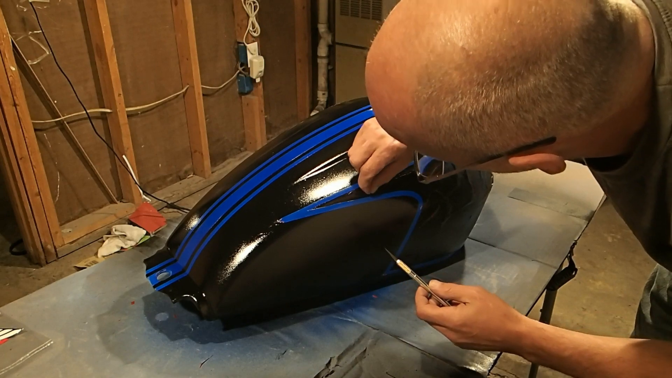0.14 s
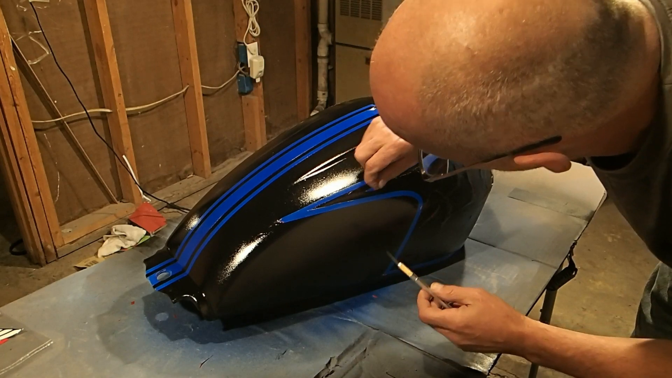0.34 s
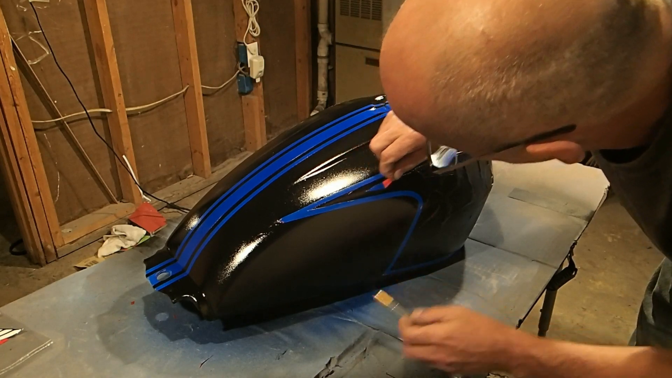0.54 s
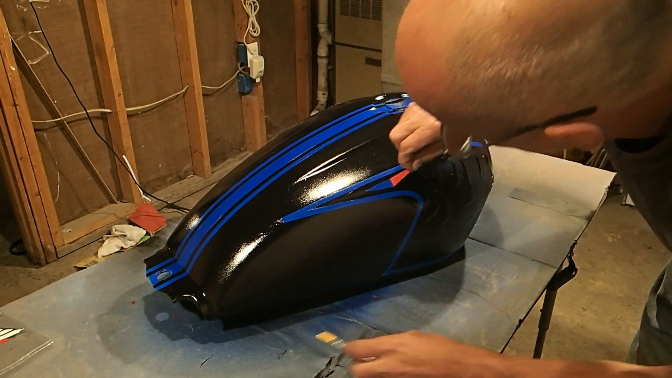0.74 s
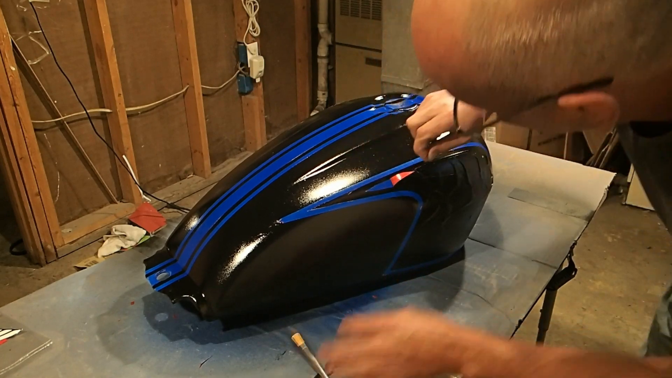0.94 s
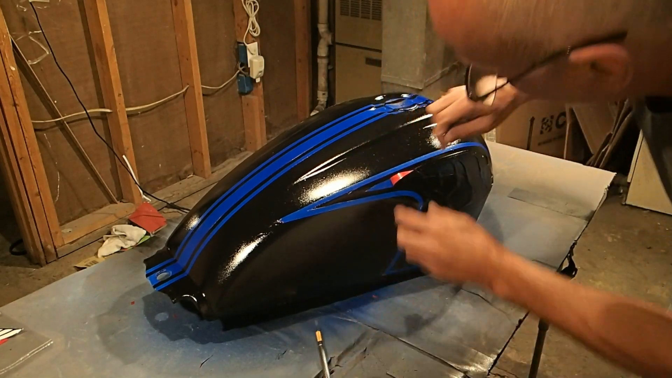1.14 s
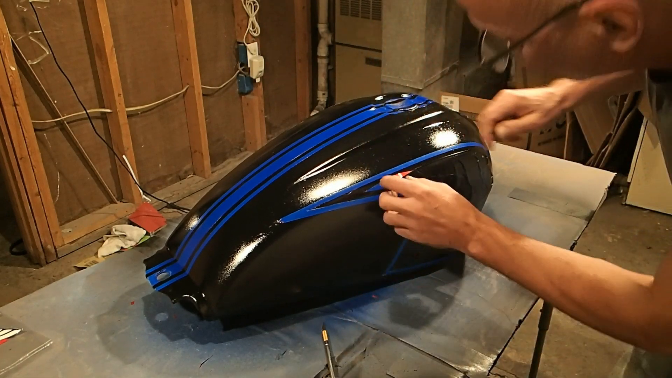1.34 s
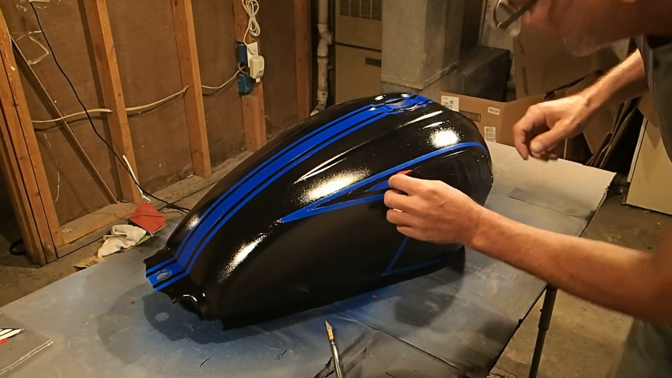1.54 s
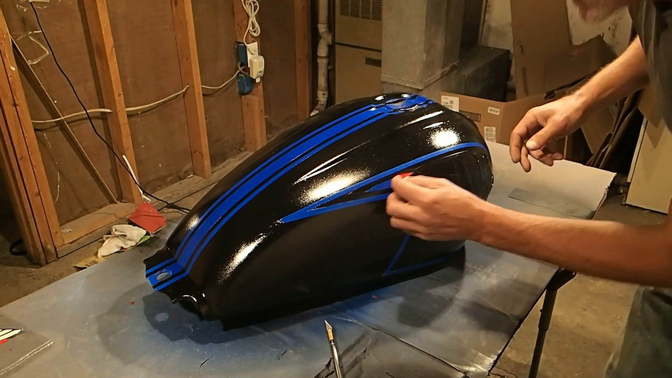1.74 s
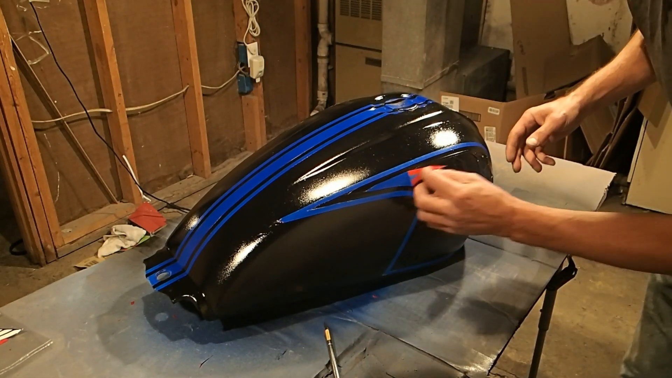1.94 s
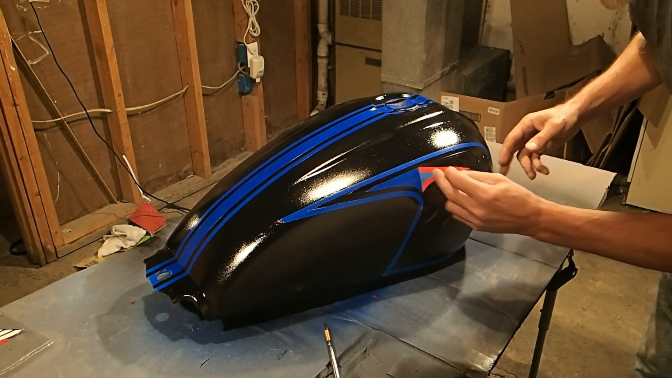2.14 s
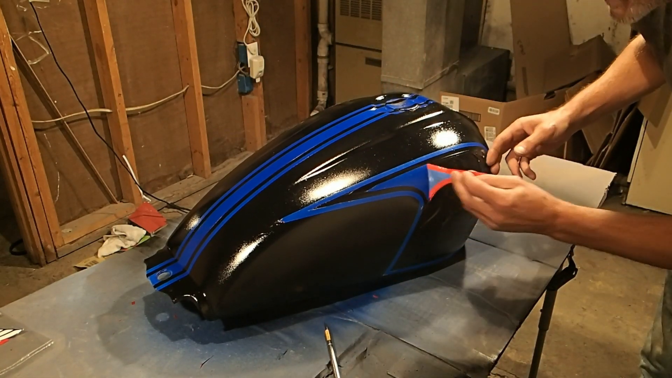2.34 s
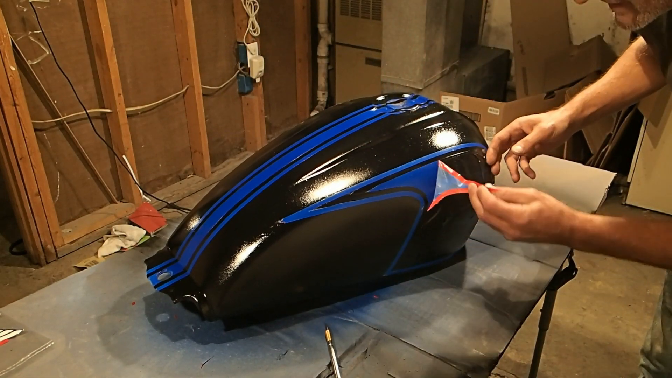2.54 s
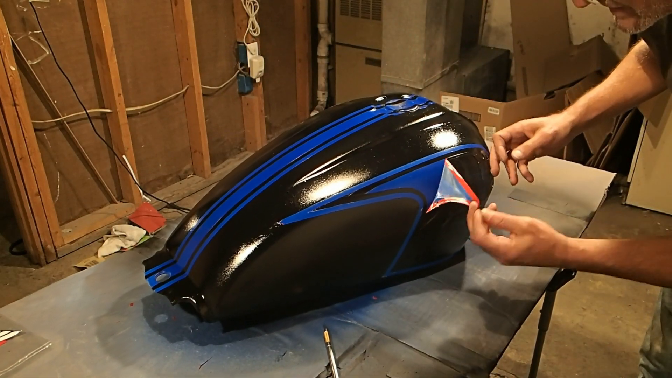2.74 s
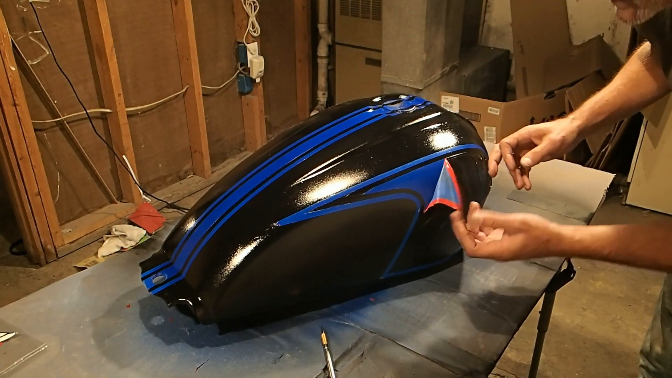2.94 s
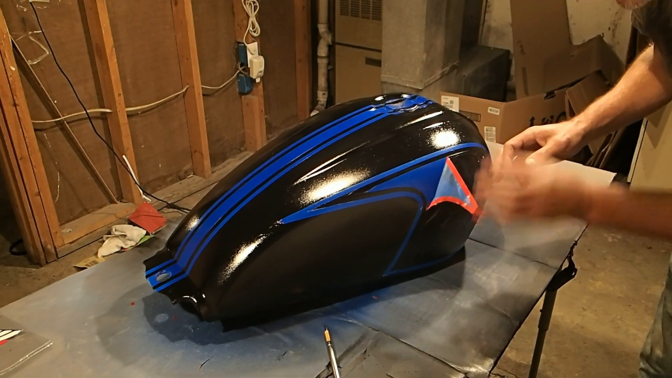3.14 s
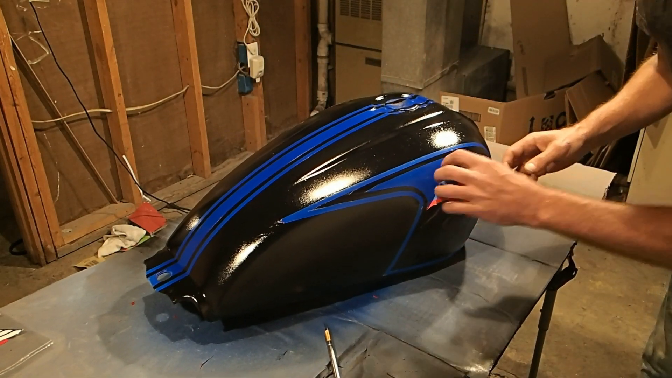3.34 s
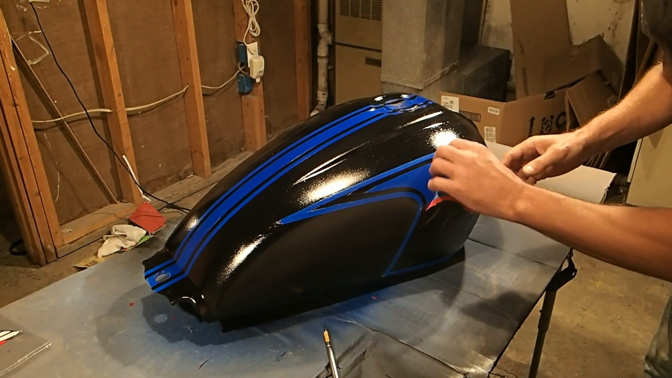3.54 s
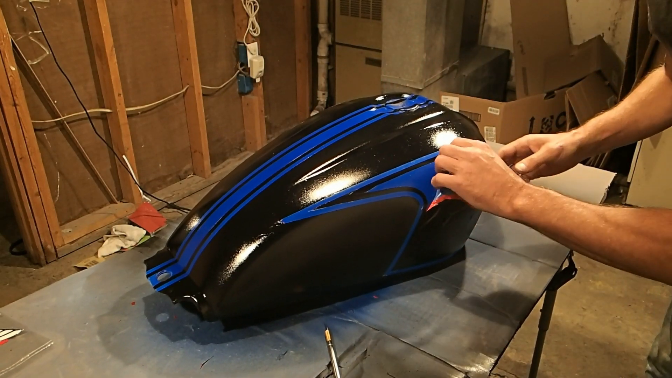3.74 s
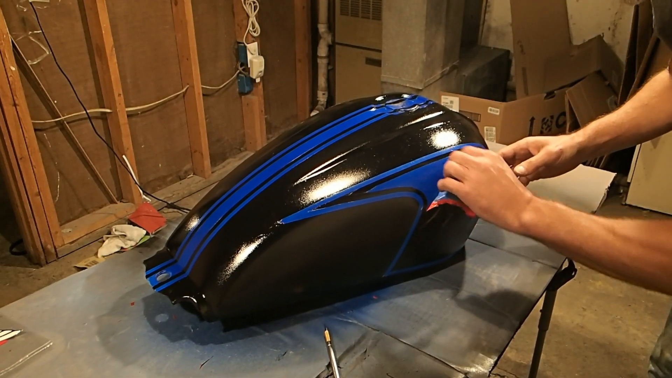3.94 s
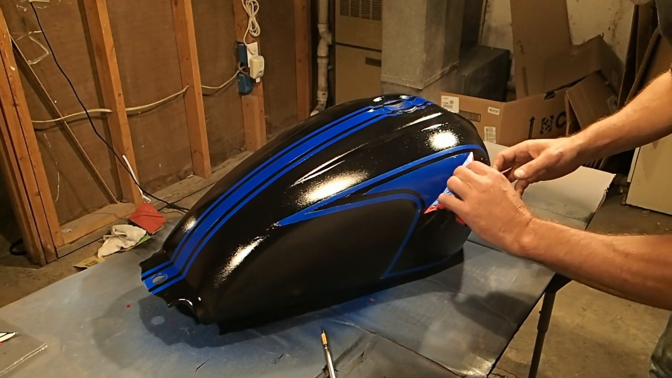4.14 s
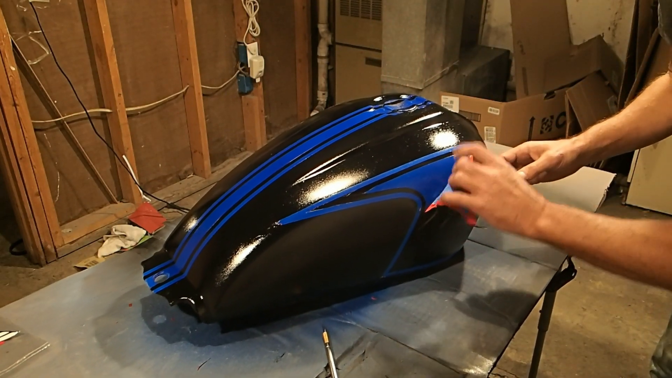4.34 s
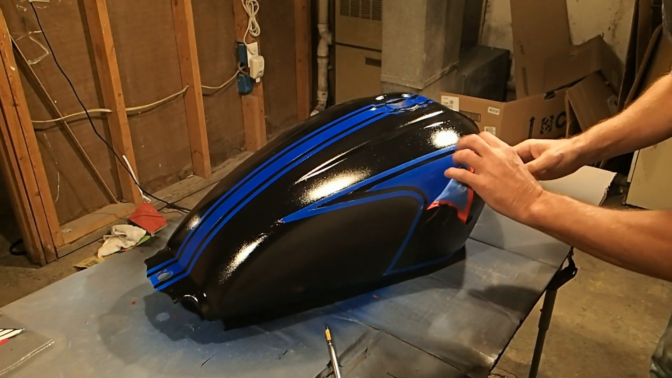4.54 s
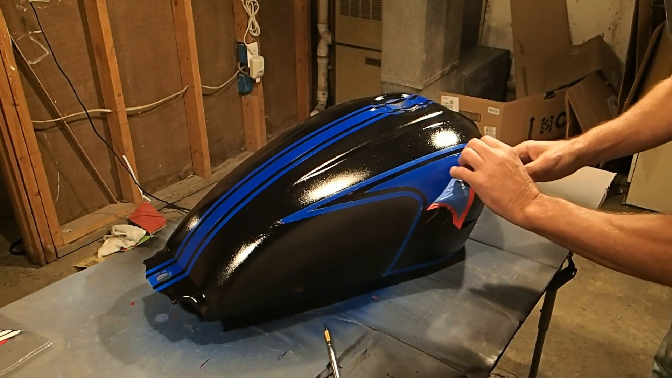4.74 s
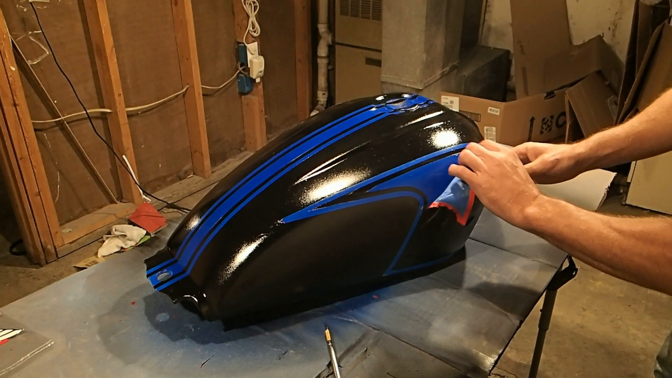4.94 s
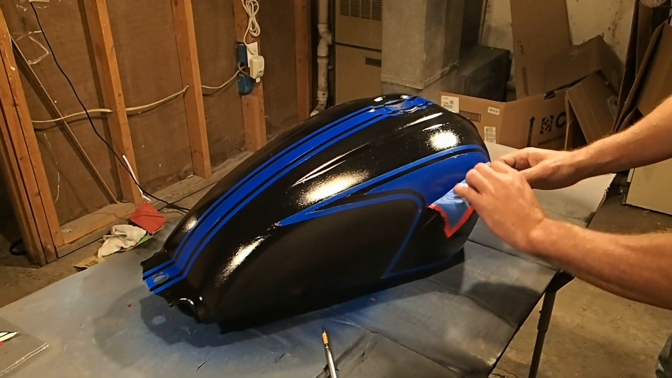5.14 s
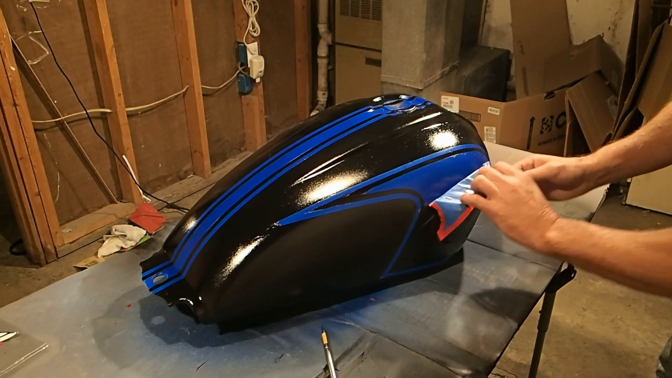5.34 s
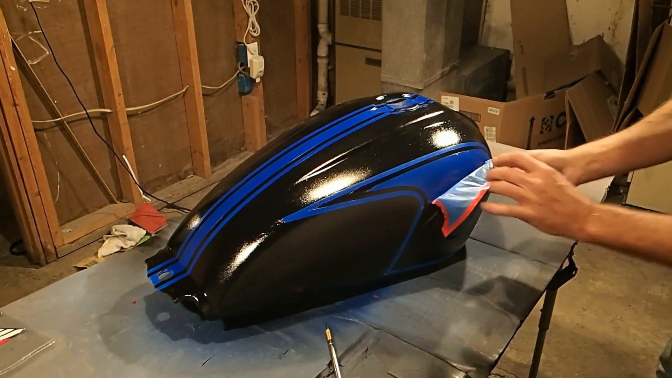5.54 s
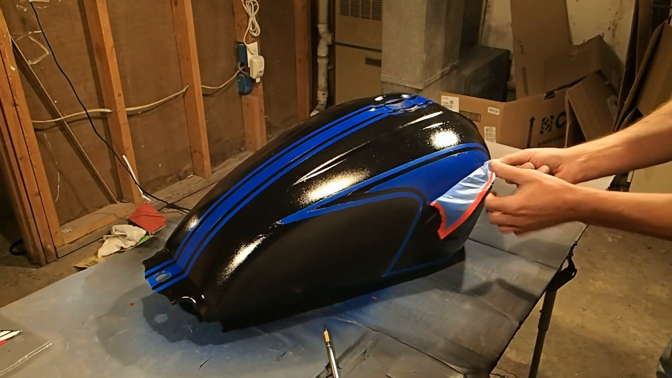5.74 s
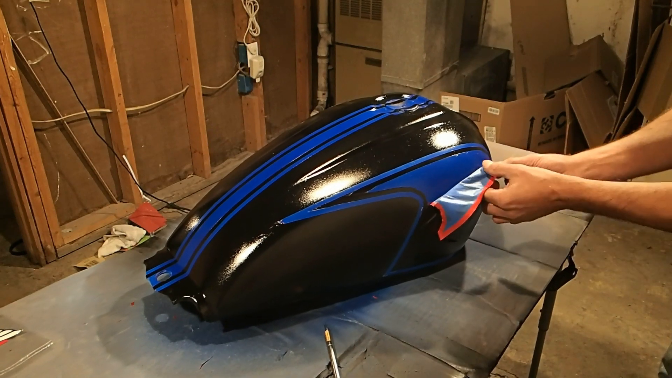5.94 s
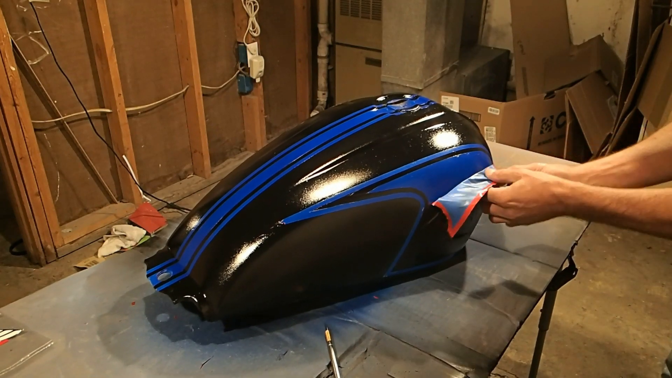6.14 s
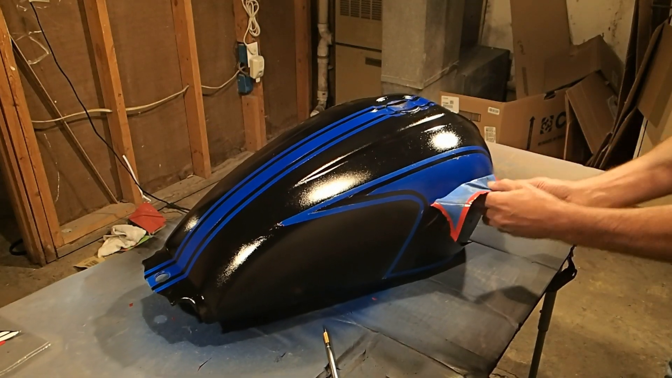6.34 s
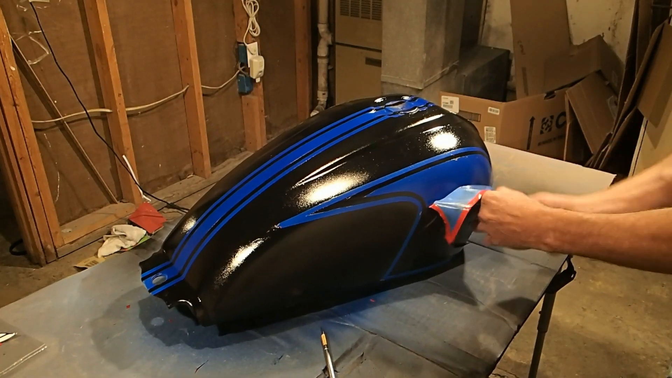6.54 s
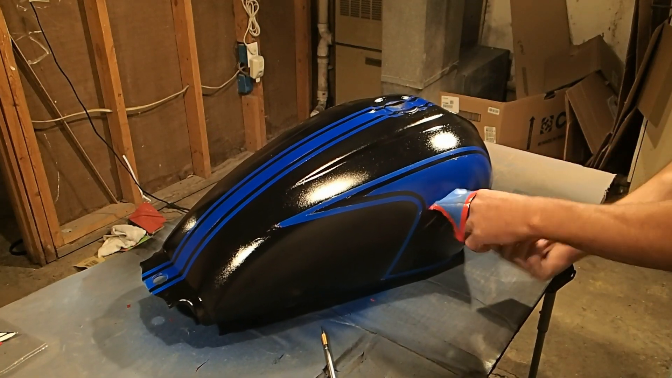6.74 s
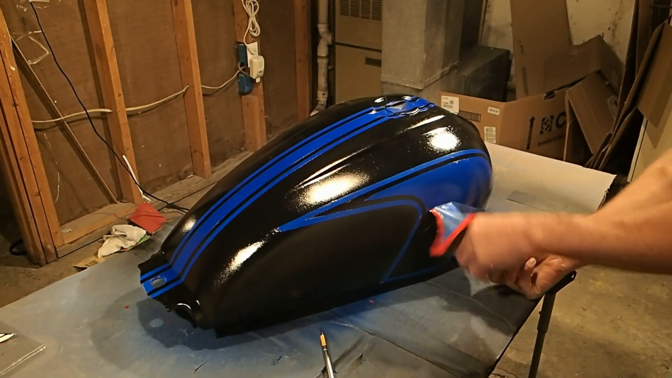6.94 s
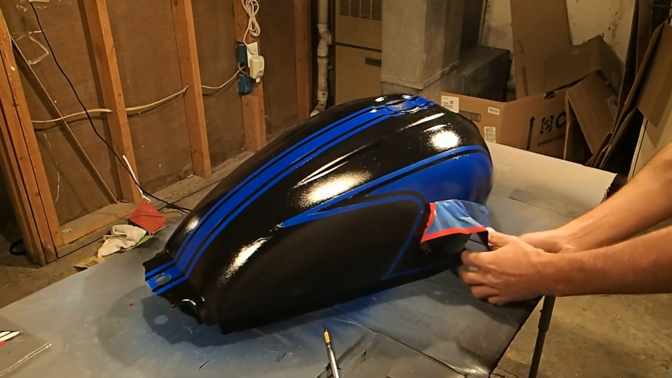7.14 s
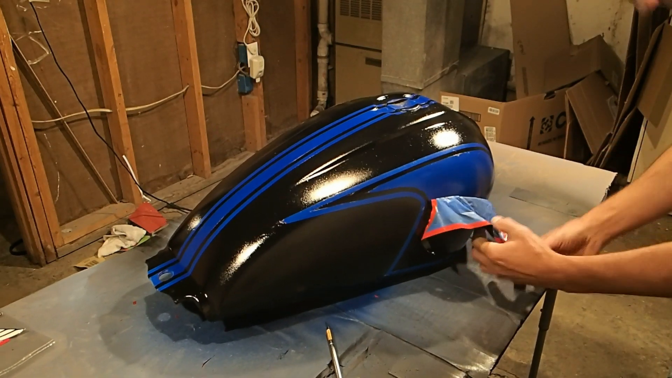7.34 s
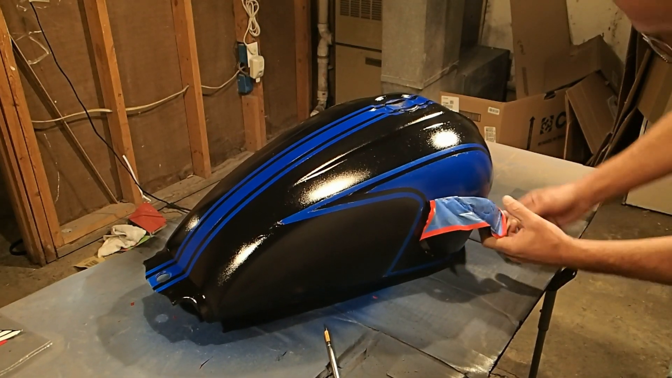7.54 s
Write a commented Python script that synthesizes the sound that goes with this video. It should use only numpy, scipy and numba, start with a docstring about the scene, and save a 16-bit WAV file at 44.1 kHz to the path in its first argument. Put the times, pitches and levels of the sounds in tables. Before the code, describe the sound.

Masking tape is peeled by hand off a hollow steel tank in short crackling rips, with sharp snaps and papery crumples.

```python
"""Masking tape and its masking sheet are peeled by hand off a freshly painted steel fuel tank.
The glue lets go in dense tiny cracks and single snaps that ring the hollow tank; the taut strip sings.
The loose sheet buckles, fingers rub and tick, a brush and hands knock softly.
Two close microphone ports hear it in a small workshop, over quiet room noise."""
import sys
import numpy as np
from scipy import signal
from scipy.fft import rfft, irfft
from scipy.io import wavfile
from numba import njit

SR = 44100
rng = np.random.default_rng(int(sys.argv[2]) if len(sys.argv) > 2 else 0)


def to_wav(sig):
    """Store sig (one row per channel, or 1-D mono) as 16-bit WAV at the path in sys.argv[1].

    Samples outside -1..1 are clipped; the rate is SR.
    """
    pcm = np.clip(np.atleast_2d(sig), -1, 1) * 32767
    pcm = np.round(pcm).astype(np.int16)
    wavfile.write(sys.argv[1], SR, pcm.T)  # frames by channels


N = 335477
TIME = np.arange(N) / SR


def undb(db):
    """Decibels to gain."""
    return 10 ** (np.asarray(db) / 20)


def unit(h):
    """Scale to energy 1."""
    return h / np.sqrt(np.sum(h ** 2, axis=-1, keepdims=True))


def convolve(x, h):
    """Pass a sound through a response."""
    return signal.oaconvolve(x, h, axes=-1)[..., :N]


def response(points, size=4096):
    """Minimum-phase impulse response of a (f/Hz, level/dB) spectrum."""
    hz, db = np.transpose(points)
    grid_hz = np.maximum(np.arange(size // 2 + 1) * SR / size, 1)
    gain = undb(np.interp(np.log(grid_hz), np.log(hz), db))
    cepstrum = irfft(np.log(gain))
    cepstrum[1:size // 2] *= 2
    cepstrum[size // 2 + 1:] = 0
    return irfft(np.exp(rfft(cepstrum)))[:size // 2]


def colour(x, points):
    """Give a white sound a spectrum at equal power."""
    return convolve(x, unit(response(points)))


def add(track, start_s, sound):
    """Mix a sound into a track."""
    i = int(np.clip(start_s * SR, 0, N - 1))
    track[i:i + len(sound)] += sound[:N - i]


def walk(per_s):
    """Random value wandering at the given rate."""
    knots = TIME[::int(SR / per_s)]
    return np.interp(TIME, knots, rng.standard_normal(len(knots)))


@njit
def resonate(x, hz, width_hz):
    """State-variable band-pass, centre set per sample; white sound keeps its power."""
    y, band, low = np.empty(len(x)), 0., 0.
    for i in range(len(x)):
        g, damping = np.tan(np.pi * hz[i] / SR), width_hz / hz[i]
        v = (band + g * (x[i] - low) + 1e-18) / (1 + g * (g + damping))
        band, low = 2 * v - band, low + 2 * g * v
        y[i] = damping * v
    return y * np.sqrt(SR / (np.pi * width_hz))


def cracks(per_s, scatter_db, size=N):
    """Randomly timed clicks of scattered strength, rms 1."""
    fired = rng.random(size) < per_s / SR
    strength = undb(scatter_db * np.clip(rng.standard_normal(size), -2, 2))
    return unit(fired * strength * rng.choice([-1, 1], size) + 1e-12) * np.sqrt(size)


def burst(fade_s, per_s, size=8192):
    """Flurry of clicks decaying from about rms 1."""
    fade = np.exp(-np.arange(size) / SR / fade_s)
    return unit(cracks(per_s, 5.6, size) * fade) * np.sqrt(np.sum(fade ** 2))


def diffuse(apart_hz, bass_side, size=N):
    """Diffuse noise at two close ports: alike in the bass, unrelated in the treble."""
    mid, side = rfft(rng.standard_normal((2, size)))
    hz = np.arange(len(mid)) * SR / size
    angle = np.pi / 4 * np.clip(bass_side + hz / apart_hz, 0, 1)
    return irfft(mid * np.cos(angle) + np.outer([1, -1], side * np.sin(angle)), size)


# Room noise spectrum: f/Hz, level/dB
ROOM_SPECTRUM = [(20, -34), (60, -11), (130, 0), (300, 0), (600, -1), (1200, -8.5), (2500, -15.5),
                 (4500, -22), (8000, -22.5), (15000, -24.5)]
def room_noise(rush_db=-45.0, rumble_db=-66):
    """Steady low rush of the building with faint hiss; the rumble differs between ports."""
    rush = convolve(diffuse(15000, 0.38), unit(response(ROOM_SPECTRUM))[None])
    low_band = signal.butter(2, [25, 90], "band", fs=SR, output="sos")
    rumble = signal.sosfilt(low_band, rng.standard_normal((2, N)))
    return undb(rush_db) * rush + undb(rumble_db) * rumble / rumble.std()


def workshop(x, early_db=-5, early_s=0.0055, tail_db=-3, t60_s=0.47, half_t60_hz=17000, size=32768):
    """Direct sound, quick bench reflections, then a short tail whose treble dies first."""
    t = TIME[:size]
    arrived = t > .0008
    build_up = 1 - np.exp(-t / 0.0064)
    blend = 0.73 * walk(8)  # moving hands and tape shift the reflections
    out = x
    for weight in (np.cos(blend), np.sin(blend)):
        early = unit(diffuse(10500, 0.099, size) * arrived * np.exp(-t / early_s))
        hz, age_s, cells = signal.stft(diffuse(14000, 0.016, size), SR)
        decay = np.exp(-np.log(1000) * np.outer(1 + (hz / half_t60_hz) ** 2, age_s) / t60_s)
        tail = unit(signal.istft(cells * decay, SR)[1][:, :size] * build_up)
        out = out + convolve((x * weight)[None], undb(early_db) * early + undb(tail_db) * tail)
    return out / np.sqrt(1 + undb(early_db) ** 2 + undb(tail_db) ** 2)


# Knock, thud and hiss (scuffs, peel line) spectra: f/Hz, level/dB
KNOCK_SPECTRUM = [(60, -11), (200, -6), (380, 4.5), (520, -1), (720, 2), (1250, -0.5), (1800, -9.5),
                  (4000, -29), (9000, -61)]
THUD_SPECTRUM = [(25, -46), (70, -15), (150, -17), (230, 2), (400, -17.5), (1500, -40)]
HISS_SPECTRUM = [(40, -59), (300, -33.5), (1500, -32.5), (3300, -3.5), (4500, -0.5), (6500, 2.5),
                 (8500, -2), (11000, -5), (13000, -14), (16000, -29)]
# Brush laid down, later hands on the tank: t/s, level/dB, thud trim/dB, contact rise/s
BUMPS = [(0.831, -13.5, -9, 0.0016), (0.88, -17, -19, 0.001), (1.005, -27.5, -7, 0.0018),
         (6.881, -32, 2, 0.0012), (6.931, -22, -4, 0.0014), (7.062, -21, -1, 0.0021),
         (7.076, -22, -3, 0.0025), (7.132, -18, -13, 0.0025), (7.152, -29, -17, 0.003)]
def bumps(knock_db=-2, thud_db=-1, boom_db=-2, boom_hz=152.0, scuff_db=-11, fade_s=0.012):
    """Soft contacts: dull knock, scuff, low thud and the boom of the hollow tank."""
    knock, thud = np.zeros((2, N))
    for start_s, db, thud_trim_db, rise_s in BUMPS:
        push = burst(fade_s, per_s=2600) * undb(db)
        push *= 1 - np.exp(-TIME[:len(push)] / rise_s)
        add(knock, start_s, push * undb(knock_db))
        add(thud, start_s, push * undb(thud_trim_db + thud_db))
    scuff = undb(scuff_db) * colour(knock, HISS_SPECTRUM)
    boom = undb(boom_db) * resonate(thud, np.full(N, boom_hz), width_hz=16.0)
    return colour(knock, KNOCK_SPECTRUM) + scuff + colour(thud, THUD_SPECTRUM) + boom


# Folds of the loose sheet: t/s, level/dB, f/Hz
BUCKLES = [(1.126, -30, 606), (4.506, -21, 567), (5.201, -27.5, 656), (5.388, -29.5, 494),
           (5.499, -19.5, 530), (5.534, -28, 700), (6.835, -27, 670), (7.281, -29, 495), (7.318, -29, 1030),
           (7.348, -28.5, 800)]
def buckles(width_hz=620.0, fade_s=0.014, puff_db=-15):
    """The freed sheet folds over with a hollow, papery crumple and a puff of air."""
    crumple, puff = np.zeros((2, N))
    for start_s, db, hz in BUCKLES:
        push = burst(fade_s, per_s=1200) * undb(db)
        centre_hz = np.full(len(push), float(hz))
        fold = resonate(resonate(push, centre_hz, width_hz), centre_hz, width_hz)
        add(crumple, start_s, unit(fold) * np.linalg.norm(push))
        add(puff, start_s, push)
    return crumple + undb(puff_db) * colour(puff, THUD_SPECTRUM)


# Notes of the taut strip: start t/s, end t/s, first f/Hz, last f/Hz, level/dB
ZIPS = [(.36, 0.825, 1380, 1480, -32.5), (1.74, 1.883, 1900, 1090, -30), (3.906, 4.02, 2330, 1110, -28),
        (4.9, 5, 3250, 1800, -34), (5.026, 5.063, 3650, 3430, -30), (6.226, 6.317, 2330, 1570, -37),
        (6.422, 6.552, 860, 885, -31.5)]
def zips(width_hz=520.0, slips_per_s=2400):
    """Quick slips pluck the taut strip; its note mostly falls as more comes free."""
    out, slips = np.zeros(N), cracks(slips_per_s, scatter_db=3.0)
    for start_s, end_s, first_hz, last_hz, db in ZIPS:
        span = (TIME >= start_s) & (TIME < end_s)
        hz = np.geomspace(first_hz, last_hz, span.sum())
        note = resonate(resonate(slips[span], hz, width_hz), hz, width_hz)
        envelope = signal.windows.tukey(len(note), .2) * undb(db)
        add(out, start_s, unit(note) * np.sqrt(len(note)) * envelope)
    return out


# Steel tank modes: f/Hz, level/dB
TANK_MODES = [(296, 4), (385, -2), (501, 3), (588, -0.5), (646, -4), (830, 4.5), (1020, -0.5), (1180, 3.5),
              (1385, -7.5), (1440, 7.5), (1615, 0.5), (1750, 6), (1998, -46), (2210, 4.5), (2542, -35),
              (2840, -4)]
def tank(push, base_width_hz=7, loss=0.0097, shift_db=2.5):
    """The shell rings; each mode swells and fades as the peel line moves over it."""
    low_cut = signal.butter(2, 220, "high", fs=SR, output="sos")  # tape is too light to drive the bass
    push = signal.sosfilt(low_cut, push)
    hz, db = np.transpose(TANK_MODES)
    widths_hz = base_width_hz + loss * hz
    weights = unit(undb(db) * np.sqrt(widths_hz))
    ring = np.zeros(N)
    for k in range(len(hz)):
        coupling = undb(shift_db * walk(4.6))
        ring += (-1) ** k * weights[k] * resonate(push * coupling, np.full(N, hz[k]), widths_hz[k])
    return ring


def spread(hiss, rasp, sizzle_db, body_db, ring_db):
    """Split cracks into five drives: sizzle, hiss, rasp, body, tank ring."""
    return np.array([hiss * undb(sizzle_db), hiss, rasp, rasp * undb(body_db), rasp * undb(ring_db)])


def fingers(hiss_db=-64, rasp_db=-60, shifts_per_s=14):
    """Fingertips rub the tape and shift grip: a faint, dry rustle that comes and goes."""
    rub = cracks(per_s=500, scatter_db=4) * undb(4 * walk(shifts_per_s))
    return spread(rub * undb(hiss_db), rub * undb(rasp_db), sizzle_db=4, body_db=-9, ring_db=-18)


# Short tugs and faint finger ticks: t/s, level/dB, rasp trim/dB
TUGS_AND_TICKS = [(1.0067, -23.5, -3.5), (1.73, -10, -4.5), (2.7639, -6.5, -8), (2.9478, -19, -9),
                  (4.3643, -20.5, 1), (4.444, -8.5, -15), (5.2717, -27, 0.5), (5.3708, -13, -8.5),
                  (5.389, -10, -10.5), (5.5, -12.5, -5), (5.734, -18.5, 3.5), (5.7794, -22.5, -1),
                  (5.8311, -33.5, 6.5), (5.895, -33, 4.5), (5.9795, -19.5, -17), (6.0223, -8, -8),
                  (6.0502, -13, -7), (6.088, -10, -12), (6.1111, -13, -7.5), (6.9656, -14.5, -13),
                  (7.0733, -17, -27), (7.2152, -13, -7), (7.3475, -19, -1.5), (7.461, -24, -8),
                  (7.5764, -31.5, -8)]
def tugs_and_ticks(hiss_db=-7, rasp_db=-4, fade_s=0.0091):
    """Short tugs and faint finger ticks: brief flurries of tiny cracks."""
    hiss, rasp = np.zeros((2, N))
    for start_s, db, rasp_trim_db in TUGS_AND_TICKS:
        flurry = burst(fade_s, per_s=3500) * undb(db)
        add(hiss, start_s, flurry * undb(hiss_db))
        add(rasp, start_s, flurry * undb(rasp_trim_db + rasp_db))
    return spread(hiss, rasp, sizzle_db=-5.5, body_db=-5.5, ring_db=-9)


# Loudest glue snaps: t/s, level/dB, rasp trim/dB
SNAPS = [(2.3104, -13, -32), (2.5892, -12, -1.5), (2.6161, -8.5, -8), (2.6755, -13.5, -2),
         (3.8205, -7, -17), (4.0171, -11, 1), (4.8582, -2.5, -10.5), (4.905, -13, 0), (4.9431, -15, 3),
         (4.9664, -10, -0.5), (6.481, -4.5, -31), (7.1633, -8.5, -2.5)]
def snaps(hiss_db=11.0, rasp_db=14, threads_db=-3, threads_s=0.001):
    """A stuck spot lets go in one sharp click; its last threads break right behind."""
    hiss, rasp = np.zeros((2, N))
    for start_s, db, rasp_trim_db in SNAPS:
        click = undb(threads_db) * unit(burst(threads_s, per_s=6800))
        click[0] = 1
        add(hiss, start_s, unit(click) * undb(db + hiss_db))
        add(rasp, start_s, unit(click) * undb(db + rasp_trim_db + rasp_db))
    return spread(hiss, rasp, sizzle_db=-29.0, body_db=-16.0, ring_db=-16.5)


def stick_slip(gap_s=0.02, jitter=0.3, scatter_db=3, count=600):
    """Glue sticks and snaps at a loosely regular pace, rms 1."""
    timing, strength = rng.standard_normal((count, 2)).T
    at = (np.cumsum(gap_s * np.exp(jitter * timing)) * SR).astype(int)
    train = np.zeros(N)
    train[at[at < N]] = undb(scatter_db * np.clip(strength[at < N], -2, 2))
    return unit(train) * np.sqrt(N)


def effort(age_s, length_s, attack_s, sag_db, swell_db=18, jerk_db=9, jerk_s=0.0096,
           release_s=0.005, rustle_db=-25.5, rustle_s=0.18):
    """Gain of one pull: swells or jerks as the glue breaks away, sags, stops, rustles out."""
    attack_s = max(attack_s, .0005)
    ease = 1 - np.exp(-age_s / (0.11 * attack_s))
    rise_db = -swell_db * (1 - np.minimum(age_s / attack_s, 1)) ** 1.11
    fall_db = sag_db * np.minimum(age_s / length_s, 1) ** 1.3
    jerk = 1 + (undb(jerk_db) - 1) * np.exp(-(age_s + attack_s) / jerk_s)
    past_s = np.maximum(age_s - length_s, 0)
    release = np.maximum(np.exp(-past_s / release_s), undb(rustle_db) * np.exp(-past_s / rustle_s))
    return ease * undb(rise_db - fall_db) * jerk * release


# Pulls on the tape: t/s, length/s, attack/s, level/dB, sag/dB, rasp trim/dB, coarse share/0-1,
# sizzle/dB re hiss, tank's freedom to ring/0-1
PULLS = [(0.292, 0.2, 0.15, -18, 10.5, -3, 0.3, -2, 0.95),
         (0.471, 0.23, 0.11, -17.5, 10.5, -3.5, 0.13, -1.5, 0.94),
         (0.695, 0.19, 0.055, -25.5, 4, -6.5, 0.02, -12, 0.9),
         (1.105, 0.11, 0.057, -33.5, 1, -9, 0.1, -19, 0.13),
         (1.255, 0.17, 0.13, -21.5, 6, -8, 0, -15, 0.09),
         (1.662, 0.46, 0.11, -14.5, 9.5, -8, 0.09, -8.5, 0.45),
         (2.18, 0.1, 0.0028, -18, 7, -10.5, 0.26, -11.5, 0.31),
         (2.306, 0.13, 0.00082, -22, 1, -11, 0.27, -6.5, 0.17),
         (2.453, 0.15, 0.035, -29.5, 6.5, -1.5, 0.85, -2, 0.36),
         (2.591, 0.11, 0.0011, -24.5, 9, -7.5, 0.94, -0.5, 0.22),
         (3.779, 0.22, 0.00048, -19.5, -2.5, -9, 0.5, -11, 0.06),
         (4.132, 0.12, 0.062, -43, 3.5, 1.5, 0, -30, 0.57),
         (4.266, 0.04, 0.048, -18.5, -2.5, -9, 0.15, -13, 0.03),
         (4.861, 0.27, 0.02, -21.5, -0.5, -10.5, 0.67, -18, 0.07),
         (6.179, 0.12, 0.0053, -19.5, 0.5, -8, 0.23, -2, 0.36),
         (6.437, 0.14, 0.001, -18, -0.5, -12, 0.24, -11.5, 0),
         (6.615, 0.061, 0.015, -19, 4.5, -9.5, 0.06, -3, 0.04),
         (6.702, 0.085, 0.00087, -21, 0, -12.5, 0.6, -14.5, 0),
         (6.795, 0.18, 0.089, -27, -4, -4.5, 0.16, -10, 0.04),
         (7.17, 0.16, 0.0074, -27.5, 2, -11, 0.7, -28, 0.66)]
def pulls(hiss_db=-6, rasp_db=-1, threads_per_s=4000, slips_per_s=170, slip_db=-2.0, snap_db=-1,
          flutter_db=3.0, waver_db=1.1, spurt_db=3, spit_db=-5, body_db=-4, ring_db=1.0):
    """Glue threads break by the thousand; at tough spots the peel line jumps in slips and snaps."""
    fine = cracks(threads_per_s, scatter_db=3.44) * undb(flutter_db * walk(80) + waver_db * walk(22))
    coarse = undb(slip_db) * cracks(slips_per_s, scatter_db=4.7) + undb(snap_db) * stick_slip()
    # thinnest threads: top octave only, in spurts
    spit = undb(spit_db) * cracks(per_s=300, scatter_db=33) * undb(spurt_db * walk(30))
    drive = np.zeros((5, N))
    for start_s, length_s, attack_s, db, sag_db, rasp_trim_db, share, sizzle_db, free in PULLS:
        span = (TIME >= start_s) & (TIME < start_s + length_s + .5)
        gain = undb(db) * effort(TIME[span] - start_s, length_s, attack_s, sag_db)
        share, free = np.clip([share, free], .001, .999)
        force = gain * (np.sqrt(1 - share) * fine[span] + np.sqrt(share) * coarse[span])
        # a resting hand turns the tank's ring into a dead body sound
        drive[:, span] += spread(force * undb(hiss_db), force * undb(rasp_trim_db + rasp_db), sizzle_db,
                                 body_db + 10 * np.log10(1 - free), ring_db + 10 * np.log10(free))
        drive[0, span] += spit[span] * gain * undb(sizzle_db)
    return drive


# Glue sizzle, paper rasp and damped body spectra: f/Hz, level/dB
SIZZLE_SPECTRUM = [(4000, -21), (7500, -6.5), (10500, -0.5), (12000, -5.5), (16000, -22.5)]
RASP_SPECTRUM = [(150, -46), (700, -18), (1400, 1.5), (2000, 8), (2800, 8), (3700, 4), (5000, -7),
                 (9000, -54.5)]
BODY_SPECTRUM = [(40, -65), (170, -26.5), (330, 6.5), (700, 1.5), (1100, 5), (1700, 10), (2400, -18.5),
                 (5000, -24.5)]
def tape(drive):
    """Cracks sound from glue, peel line and paper backing, and shake the shell below."""
    sizzle, hiss, rasp, body, ring = drive
    strip = colour(sizzle, SIZZLE_SPECTRUM) + colour(hiss, HISS_SPECTRUM) + colour(rasp, RASP_SPECTRUM)
    return strip + colour(body, BODY_SPECTRUM) + tank(ring)


def scene():
    """All handling sounds in the room, over its steady noise."""
    peeling = tape(pulls() + snaps() + tugs_and_ticks() + fingers())
    return workshop(peeling + zips() + buckles() + bumps()) + room_noise()


# Microphone response: f/Hz, level/dB
MICROPHONE = [(20, -10), (65, 0.5), (3000, 2), (3600, 2.5), (4020, -5.5), (4500, 4), (5250, 10.5),
              (5800, 5), (6700, -1.5), (8000, -2)]
def record(dry, right_db=2.0, top_hz=15900):
    """The microphone housing rings near 5 kHz with a notch below; peaks clip, the top is cut."""
    balance = undb(np.array([[-right_db], [right_db]]) / 2)
    heard = convolve(dry, response(MICROPHONE)[None]) * balance
    top_cut = signal.ellip(8, .2, 70, top_hz, fs=SR, output="sos")
    return signal.sosfilt(top_cut, np.clip(heard, -1, 1))


dry = scene()
out = record(dry)
to_wav(out)
```